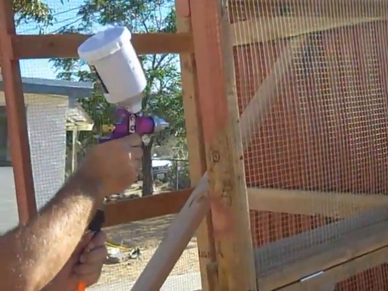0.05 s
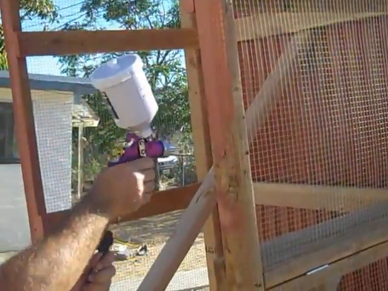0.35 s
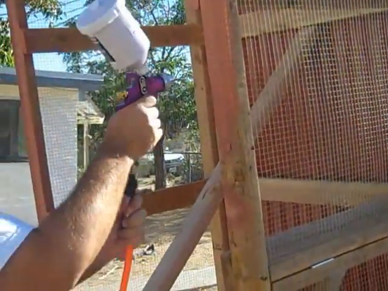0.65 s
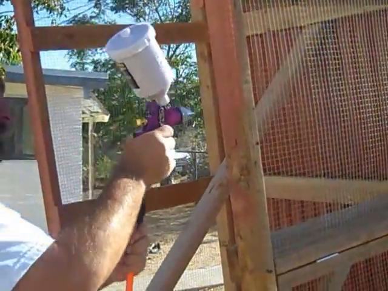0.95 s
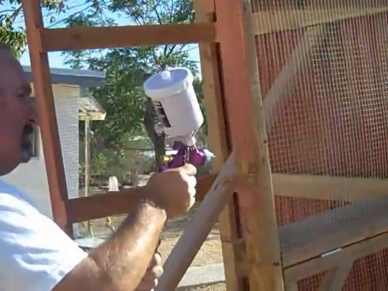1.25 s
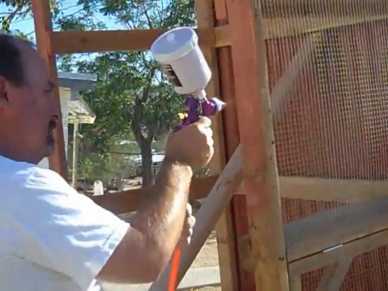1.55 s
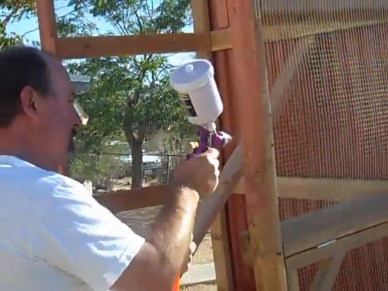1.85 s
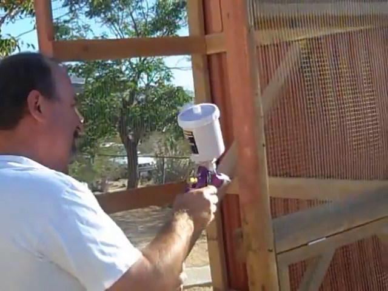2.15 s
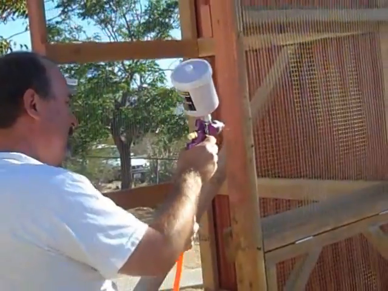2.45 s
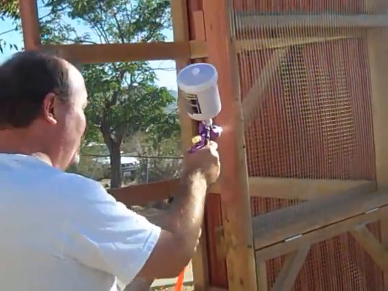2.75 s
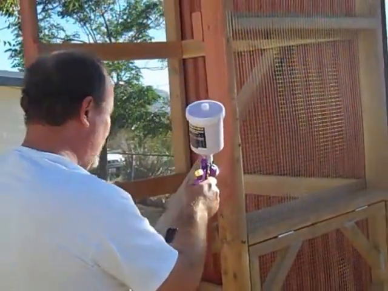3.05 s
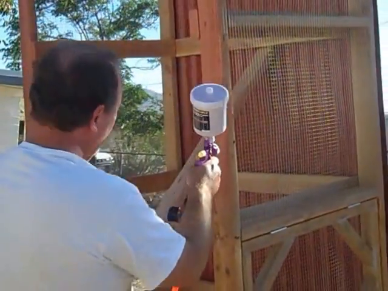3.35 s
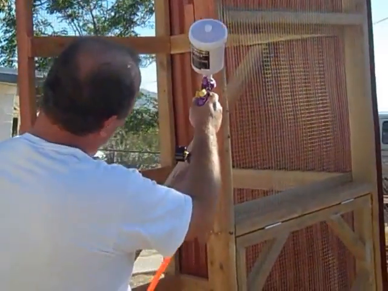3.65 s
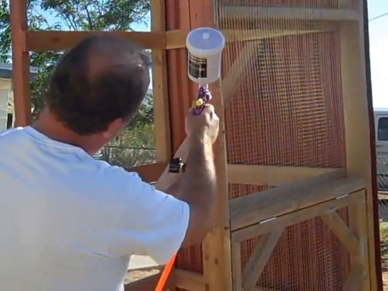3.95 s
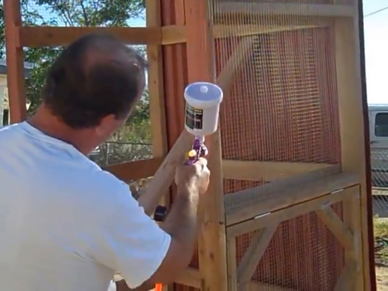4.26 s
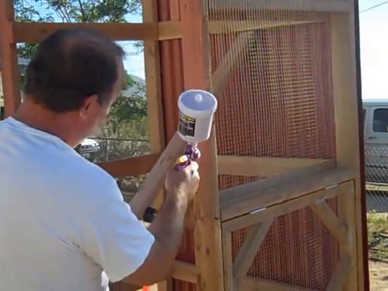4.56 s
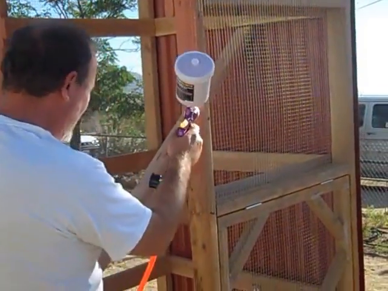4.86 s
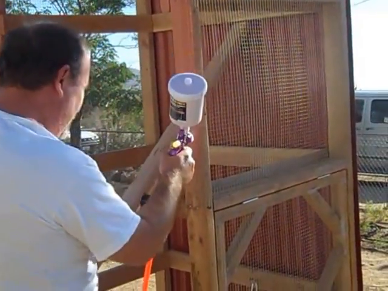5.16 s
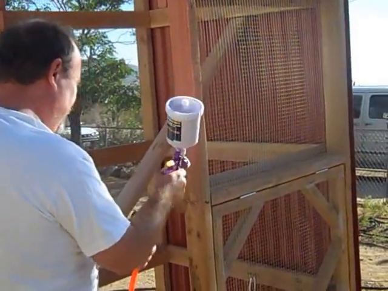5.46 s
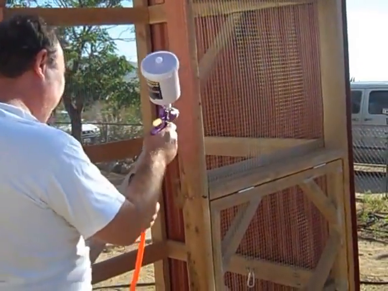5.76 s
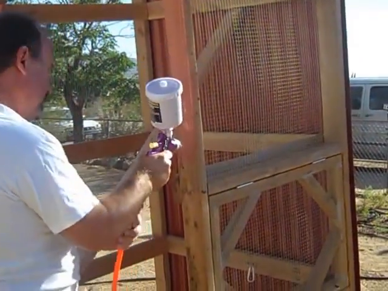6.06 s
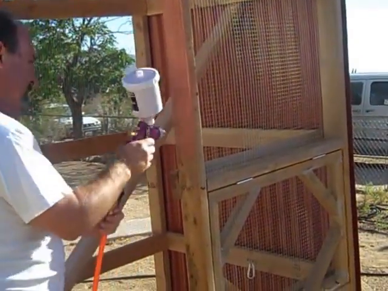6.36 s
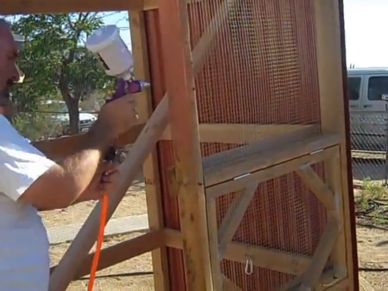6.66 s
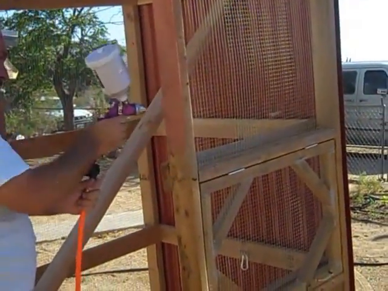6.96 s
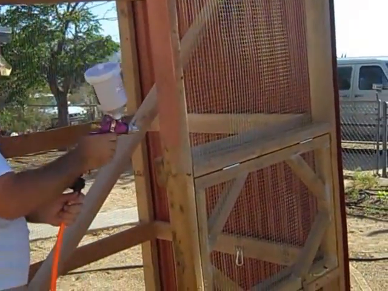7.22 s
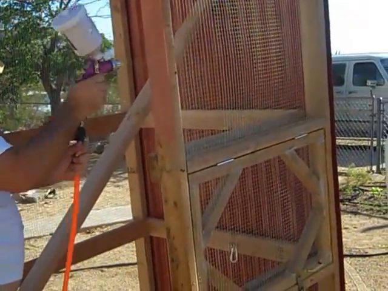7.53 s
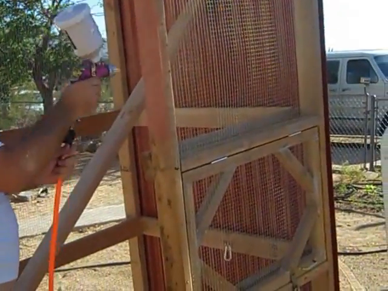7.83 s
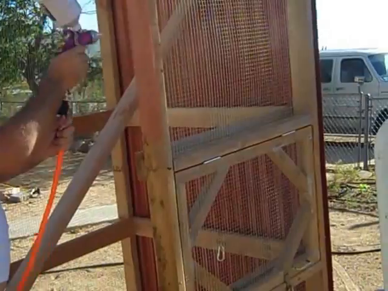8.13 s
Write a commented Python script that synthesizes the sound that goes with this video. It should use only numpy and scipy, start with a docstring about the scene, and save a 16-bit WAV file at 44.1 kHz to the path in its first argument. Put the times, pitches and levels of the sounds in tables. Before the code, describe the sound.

Close, bright bursts of hiss from a paint sprayer start and stop, with quiet road noise in the short gaps.

```python
"""A close, bright hiss in seven bursts: an air spray gun painting a wooden frame outdoors, in stereo.
The nozzle hisses while the trigger is held, and the jet roars where it meets the wood. Echoes off
nearby posts and boards shift its colour as the hand strokes up and down. Between pulls a faint air leak
comes through, along with road noise, a light breeze, a steady motor hum, one far engine changing speed
and, in the second half, a few chirps of a bird."""
import sys
import numpy as np
from scipy import signal
from scipy.fft import rfft, irfft
from scipy.io import wavfile
from scipy.ndimage import uniform_filter1d

SR = 44100
rng = np.random.default_rng(int(sys.argv[2]) if len(sys.argv) > 2 else 0)


def transcribe(signal):
    """Save signal, clipped to [-1, 1], as a 16-bit WAV file at the path in sys.argv[1]."""
    frames = np.atleast_2d(signal).T
    limited = np.clip(frames, -1, 1)
    pcm = np.round(limited * 32767).astype(np.int16)
    wavfile.write(sys.argv[1], SR, pcm)


N = 369999
TIME = np.arange(N) / SR
FFT, HOP = 2048, 512
BINS = np.fft.rfftfreq(FFT, 1 / SR)
FRAMES = np.arange(N // HOP + 3) * HOP / SR

# Trigger pulls. Each row: valve opens and shuts in seconds, air alone before the paint in seconds,
# hiss level in dB, fade as the gun turns away in dB, air-cap bite in dB, left minus right treble in dB,
# echo delay off the sprayed post in seconds.
PULLS = [(-.2, .424, .02, -19, -0.1, 2.3, 1, 0.0014), (0.663, 2.249, .012, -19, 3, 2.2, 0.7, .00087),
         (2.448, 3.324, 0.16, -22.5, 1, 1, 2, 0.00092), (3.806, 4.54, 0.028, -22.5, 0.6, 1.5, 0.2, .00081),
         (4.827, 5.548, .02, -22.5, 0.5, 1.3, 0.4, .0013),
         (5.818, 6.311, .008, -22.5, -1.4, -0.3, 1.5, 0.0014), (6.665, 8.6, .002, -19, 1, -1, 0.5, 0.0013)]
# Tone colours of the hiss, the roar on wood, the leak, the road and the breeze.
# Each row: frequency in Hz, relative level in dB.
HISS_COLOUR = [(60, -28), (250, -8), (800, -13), (1300, -8), (1700, -5.5), (1900, -5.5), (2200, -3),
               (3200, -3.5), (4500, -0.5), (6000, 2), (8500, 2.5), (10000, -1), (11500, -2), (14000, 3.5)]
ROAR_COLOUR = [(40, -30), (150, -9), (380, -5.5), (620, 3), (1050, 0), (1350, -3.5), (2000, -4.5),
               (3000, -28), (6000, -35)]
LEAK_COLOUR = [(100, -30), (1500, -10), (3000, 4), (8000, 3.5), (11000, 4.5), (14000, 6)]
ROAD_COLOUR = [(20, -33), (35, -25), (55, -10), (85, -4.5), (110, -1.5), (160, 0), (250, 0.5), (500, -5),
               (900, -7), (1500, -11), (2500, -17.5), (5000, -22.5), (14000, -42)]
BREEZE_COLOUR = [(15, -22), (35, -14), (55, 0), (90, 0), (160, -14), (400, -35), (1500, -70)]
# Swells: the jet hitting a frame edge squarely, gusts, and booms of the engine's second order.
# Each row: centre in seconds, half length in seconds, peak level in dB.
EDGE_HITS = [(.15, 0.19, -43.5), (2.83, 0.16, -41), (4.1, .25, -48.5), (5.02, 0.16, -40.5), (6.05, .2, -47),
             (6.84, 0.22, -29.5), (8.29, 0.21, -38.5)]
GUSTS = [(.25, .2, -60), (1.51, .06, -48), (2.05, .15, -57), (2.88, .15, -53), (4.9, .12, -56),
         (6.1, .1, -59)]
ENGINE_BOOMS = [(.32, .1, -46), (6.3, 0.15, -48.5), (8.33, .1, -54)]
# Hand strokes. Each row: time the top is reached in seconds, gun height in metres.
STROKES = [(0, .088), (.75, 0.11), (1.7, 0.14), (2.6, 0.08), (3.8, .23), (4.9, 0.024), (5.8, .06),
           (6.7, .14), (7.8, .25)]
# Echoes off posts and boards. Each row: delay in seconds, added delay in seconds per metre of height,
# share of the direct sound (negative where it bends round an edge), treble cutoff in Hz.
ECHOES = [(.00156, -0.0059, -.12, 4000), (.00184, 0.0054, 0.06, 3500), (.00246, 0.0048, -0.073, 5000),
          (.0046, .0012, .11, 7000), (.0059, -.0016, 0.14, 14000)]
# The far engine. Each row: time in seconds, firing rate in Hz, level in dB.
ENGINE_REVS = [(0, 121.9, -57.5), (.5, 138.7, -54), (1, 137, -78), (3.2, 107, -72), (4.3, 105, -52.5),
               (5.6, 130.6, -57), (6.3, 142.3, -57), (7.2, 154.5, -56), (7.6, 152.9, -61),
               (8.35, 118.6, -50)]
# Motor tones. Each row: pitch in Hz, level in dB.
MOTOR_TONES = [(121, -55), (883, -67), (992, -65)]
# Bird glides. Each row: start and length in seconds, first and last pitch in Hz, level in dB.
CHIRPS = [(4.76, .05, 4300, 3570, -56), (4.8, 0.038, 3550, 4670, -52), (5.7, .02, 3600, 3800, -55),
          (6.342, 0.022, 3750, 4100, -56), (6.372, .022, 3750, 4100, -57), (6.468, .03, 4200, 3500, -53),
          (6.502, .028, 3750, 4800, -51)]
# Microphone ports, left then right. Each row: resonance in Hz, width in Hz, treble shading in dB.
MIC_PORTS = [(8200, 1510, -1.5), (6440, 1380, -8)]
# Phase between the ports. Each row: frequency in Hz, lead of the left in radians.
LEFT_LEAD = [(4400, 0), (5300, -0.5), (5900, 0), (6700, 0.94), (7300, 0.8), (8000, 0.6), (8900, -0.8),
             (11000, -2.4), (14000, -0.5)]
# Stereo image of the gun, the far traffic and the breeze.
# Each row: frequency in Hz, left-right likeness from 0 (wide) to 1 (narrow).
GUN_IMAGE = [(100, 0.95), (1300, 0.93), (2100, 1), (4200, 1), (5100, 0.73), (6500, 0.86), (8800, 0.6),
             (11000, 0.55), (12700, 0.4), (14000, .25)]
FAR_IMAGE = [(25, .4), (45, 0.51), (80, 0.69), (150, 0.92), (700, 0.9), (1400, 0.46), (6000, 0.15)]
BREEZE_IMAGE = [(30, .5), (70, 0.62)]


def gain_of(db):
    """Decibels to amplitude."""
    return 10 ** (np.asarray(db) / 20)


def unit_rms(x):
    """Scales to rms 1."""
    return x / np.sqrt(np.mean(x ** 2) + 1e-20)


def over_bins(points):
    """Joins the points of a curve on a log-frequency axis."""
    hz, value = np.transpose(points)
    return np.interp(np.log(BINS + 1), np.log(hz + 1), value)


def over_time(rows, t=TIME):
    """The columns of an automation table at times t."""
    times, *columns = np.transpose(rows)
    return [np.interp(t, times, column) for column in columns]


def drift(rate_hz):
    """A random wobble of rms 1, up to about the given rate."""
    hz = np.fft.rfftfreq(N, 1 / SR)
    return unit_rms(irfft(rfft(rng.standard_normal(N)) / (1 + (hz / rate_hz) ** 4), N))


def patches(frames, bins):
    """Smooth random patches of rms 1 over time and frequency."""
    field = rng.standard_normal((len(FRAMES), len(BINS)))
    for _ in range(2):
        field = uniform_filter1d(field, frames, axis=0)
        field = uniform_filter1d(field, bins, axis=1)
    return unit_rms(field)


def swells(rows, base_db):
    """Amplitude of bell-shaped swells, added in power to a base level."""
    power = gain_of(base_db) ** 2
    for centre, half_length, db in rows:
        power = power + (gain_of(db) * np.exp(-((TIME - centre) / half_length) ** 2)) ** 2
    return np.sqrt(power)


def mic_ports(shade_hz=6000):
    """Each port is a small cavity that rings in the treble; the right one faces away and is duller."""
    hz, width, shade_db = np.transpose(MIC_PORTS)[:, :, None]
    cavity = 1 / np.hypot(1 - (BINS / hz) ** 2, BINS * width / hz ** 2)
    shade = gain_of(shade_db * BINS ** 2 / (BINS ** 2 + shade_hz ** 2))
    return (cavity * shade)[:, None]


def stereo_noise(colour_db, image):
    """Noise with a still or moving colour, heard through both ports; its mono mix has rms 1."""
    a, b, c, d = rng.standard_normal((4, len(FRAMES), len(BINS)))
    likeness = np.clip(over_bins(image), 0, 1)
    left = a + 1j * b
    right = likeness * left + np.sqrt(1 - likeness ** 2) * (c + 1j * d)
    right *= np.exp(-1j * over_bins(LEFT_LEAD))
    spectra = np.array([left, right]) * gain_of(colour_db) * mic_ports()
    noise = signal.istft(spectra.swapaxes(1, 2), nperseg=FFT, noverlap=FFT - HOP)[1][:, :N]
    return noise / np.std(noise.mean(0))


def valve(opening_s=.022, closing_s=.036, air_alone_db=-5.5, paint_rise_s=.11, bleed_db=-17.5):
    """Flow from 0 to 1: softer air first, then paint as the needle lifts, then trapped air bleeds off."""
    flow = np.zeros(N)
    for start, shut, air_alone, *_ in PULLS:
        squeeze_s = opening_s + .26 * air_alone  # a slow finger lengthens the attack
        attack = np.clip((TIME - start) / squeeze_s, 0, 1) ** .7
        paint = np.clip((TIME - start - air_alone) / paint_rise_s + .5, 0, 1)
        release = np.clip((shut - TIME) / closing_s, 0, 1) ** 1.25
        bleed = gain_of(bleed_db) * np.exp(-np.maximum(TIME - shut, 0) / .027)
        flow += attack * gain_of(air_alone_db * (1 - paint)) * np.maximum(release, bleed)
    return flow


def aim(t):
    """Level, bite, pan and post echo at times t: each pull has its own aim, and the gun slowly turns."""
    start, shut, _, level_db, fade_db, bite_db, pan_db, echo_s = np.transpose(PULLS)
    pull = np.searchsorted((shut[:-1] + start[1:]) / 2, t)
    progress = np.clip((t - start[pull]) / (shut - start)[pull], 0, 1)
    turned_db = level_db[pull] - fade_db[pull] * progress ** 1.45
    return turned_db, bite_db[pull], pan_db[pull], echo_s[pull]


def gun_height(dip_m=.11):
    """Height in metres at each frame: the hand eases down from one stroke's top and up to the next."""
    times, tops = np.transpose(STROKES)
    lows = zip((times[:-1] + times[1:]) / 2, np.minimum(tops[:-1], tops[1:]) - dip_m)
    turns = sorted([*zip(times, tops), *lows])
    return uniform_filter1d(over_time(turns, FRAMES)[0], size=15)


def echo_comb_db(post_delay, post_share=.085, post_cutoff_hz=3500):
    """The sprayed post combs the sound; combs from other surfaces slide as the gun rises and falls."""
    height = gun_height()[:, None]
    paths = 1
    for delay, slope, share, cutoff_hz in [(post_delay, 0, post_share, post_cutoff_hz), *ECHOES]:
        echo = share / (1 + (BINS / cutoff_hz) ** 2)
        paths = paths + echo * np.exp(-2j * np.pi * BINS * (delay + slope * height))
    return 20 * np.log10(abs(paths) + 1e-3)


def nozzle_hiss(comb_db, side_on_db=-23.5, cap_hz=2600, cap_width_hz=1000, shimmer_db=1.09):
    """The turbulent jet hisses, brighter as it points our way, with a broad bite from the air cap."""
    level_db, bite_db, pan_db, _ = (column[:, None] for column in aim(FRAMES))
    beam_db = .6 * (level_db - side_on_db) * over_bins([(7500, .068), (12000, 1)])
    cap_db = bite_db * np.exp(-(2 * (BINS - cap_hz) / cap_width_hz) ** 2)
    treble = over_bins([(4000, 0), (6000, 1)])  # only the treble is panned; lower down it stays centred
    sides_db = np.array([pan_db, -pan_db]) / 2 * treble
    eddies_db = shimmer_db * patches(frames=3, bins=12)
    colour_db = over_bins(HISS_COLOUR) + beam_db + cap_db + sides_db + comb_db + eddies_db
    return stereo_noise(colour_db, GUN_IMAGE) * gain_of(aim(TIME)[0])


def wood_roar(comb_db, grazing_db=-48.5):
    """Air grazing the wood gives a lower roar that flares where the jet hits an edge."""
    return stereo_noise(over_bins(ROAR_COLOUR) + comb_db, GUN_IMAGE) * swells(EDGE_HITS, grazing_db)


def spray_gun(scatter_db=1.18, hiss_flutter_db=.34, roar_flutter_db=.8):
    """Hiss and roar share one valve and the same echoes; the moving arm scatters many more small ones."""
    *_, post_delay = aim(FRAMES)
    comb_db = echo_comb_db(post_delay[:, None]) + scatter_db * patches(frames=14, bins=7)
    hiss = nozzle_hiss(comb_db)
    roar = wood_roar(comb_db)
    hiss *= gain_of(hiss_flutter_db * drift(52))
    roar *= gain_of(roar_flutter_db * drift(40))
    return valve() * (hiss + roar)


def air_leak(db=-53.5):
    """A thin thread of air escapes from the gun all the time."""
    return gain_of(db) * stereo_noise(over_bins(LEAK_COLOUR), GUN_IMAGE)


def road(db=-44.5, swell_db=.52):
    """A bed of far traffic, swelling a little."""
    return gain_of(db + swell_db * drift(1.6)) * stereo_noise(over_bins(ROAD_COLOUR), FAR_IMAGE)


def breeze(lull_db=-66, waver_db=2):
    """Soft low buffeting on the microphone with a few gusts, partly different at each port."""
    strength = swells(GUSTS, lull_db + waver_db * drift(2.2))
    return strength * stereo_noise(over_bins(BREEZE_COLOUR), BREEZE_IMAGE)


def motor_hum(waver_db=2, wander_hz=2.4):
    """A motor hums nearby with a faint whine, wavering in the open air."""
    hum = np.zeros(N)
    for hz, db in MOTOR_TONES:
        cycles = np.cumsum(hz + wander_hz * drift(7.1)) / SR
        tone = gain_of(waver_db * drift(7.7)) * np.sin(2 * np.pi * cycles)
        hum += gain_of(db) * unit_rms(tone)
    return hum


def far_engine(waver_db=2, wander=.0074, second_order_db=-9):
    """Only a vehicle's two lowest exhaust orders carry this far; the upper one booms now and then."""
    hz, db = over_time(ENGINE_REVS)
    phase = 2 * np.pi * np.cumsum(hz * (1 + wander * drift(10))) / SR
    firing = gain_of(db) * np.sin(phase)
    octave = swells(ENGINE_BOOMS, db + second_order_db) * np.sin(2 * phase)
    return np.sqrt(2) * (firing + octave) * gain_of(waver_db * drift(2.9))


def bird(roughness_db=2.5):
    """Short gliding whistles, roughened on their way through the trees."""
    song = np.zeros(N)
    for start, length, first_hz, last_hz, db in CHIRPS:
        progress = np.clip((TIME - start) / length, 0, 1)
        cycles = np.cumsum(first_hz + (last_hz - first_hz) * progress) / SR
        song += gain_of(db) * np.sin(np.pi * progress) * np.sin(2 * np.pi * cycles)
    return song * gain_of(roughness_db * drift(200))


def scene():
    """The gun up front, the yard behind it."""
    return spray_gun() + air_leak() + road() + breeze() + motor_hum() + far_engine() + bird()


def record(dry):
    """A steep low-pass takes off the very top of the treble."""
    lowpass = signal.firwin(801, cutoff=14290, window=("kaiser", 8), fs=SR)
    return signal.oaconvolve(dry, lowpass[None], "same")


dry = scene()
out = record(dry)
transcribe(out)
```